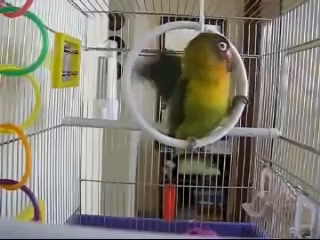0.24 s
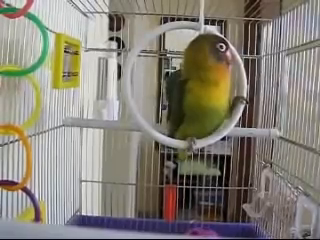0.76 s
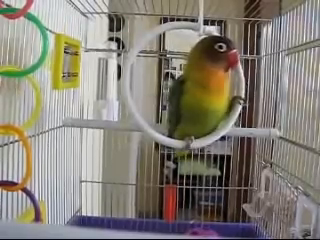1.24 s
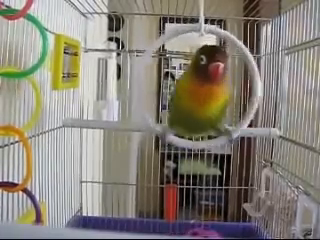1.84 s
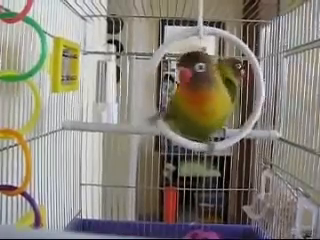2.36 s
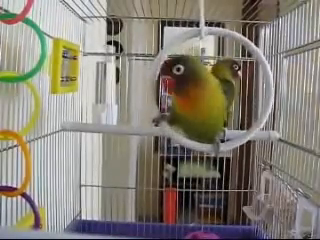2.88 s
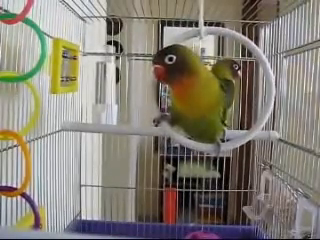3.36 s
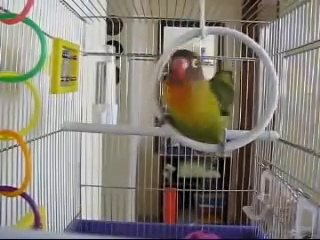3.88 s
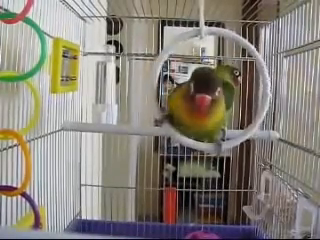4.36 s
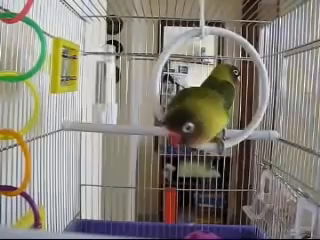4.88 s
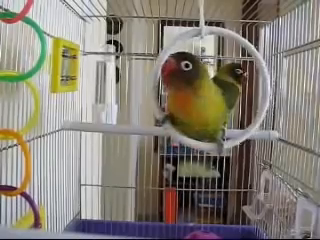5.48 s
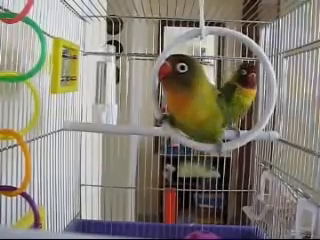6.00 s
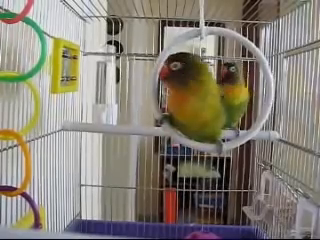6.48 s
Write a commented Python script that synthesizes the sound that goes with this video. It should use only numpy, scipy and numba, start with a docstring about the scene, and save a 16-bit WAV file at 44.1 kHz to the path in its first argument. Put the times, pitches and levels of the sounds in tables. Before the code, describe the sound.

In a lived-in room, lovebirds chirp shrilly near a stereo camera microphone. A quick cluster of chirps, a long pause, a faint squeal and a tiny chirp lead to a strong scratchy warble, then a softer one, then rapid loud chattering that clips slightly. Metallic cage reflections and short echoes surround each call; low hum and soft noise sit slightly left.

```python
"""A living room: lovebirds chirp shrilly in a wire cage, close to a small camera's stereo microphone.
Each syllable (chirp, pip, warble or chatter note) is a darting whistle with rasp, coloured by throat and beak.
The cage scatters it at once, nearby walls return echoes and the room rings.
Behind the birds, a little to the left, lie noise shaped as room tone, sine hums and a faint far tone in arches."""
import sys
import numpy as np
from scipy import signal
from scipy.fft import rfft, irfft, next_fast_len
from scipy.io import wavfile
from numba import njit

SR = 44100
rng = np.random.default_rng(int(sys.argv[2]) if len(sys.argv) > 2 else 0)


def wav_out(sig):
    """Save sig, one row per channel (or a flat mono array), as 16-bit PCM at SR to the path in sys.argv[1]."""
    wavfile.write(sys.argv[1], SR, np.round(np.clip(np.atleast_2d(sig).T, -1, 1) * 32767).astype(np.int16))


N = 297234
T = np.arange(N) / SR  # seconds

# Resonances of throat and open beak. Each row: frequency in Hz, relative gain in dB.
THROAT_RESONANCE = [(1000, -40.5), (1850, -27), (2400, -8.5), (3400, 0), (4900, 7.5), (6400, -3.5),
                    (8000, 3), (10000, 1), (12000, -4.5)]
# Chirps, a low lead-in that flicks up and falls back. Each row: top of the flick in seconds, lead-in in s,
# fall in s, glide in s, lead-in pitch in Hz, landing pitch in Hz, end pitch in Hz, lead-in level in dB,
# level in dB, rasp 0-1, overtones in dB before a common lift, spill into the room in dB.
CHIRP_NOTES = [(0.001, .012, 0.012, 0.012, 2700, 6050, 4620, -80, -8.5, 0.23, -27, 7.5),
               (0.072, 0.014, 0.0079, 0.016, 2770, 3950, 4664, -17, -9, 0.12, -8, 9.5),
               (0.170, 0.013, 0.0092, 0.02, 2696, 4300, 5185, -15, -6, 0.23, -12.5, 9),
               (0.304, 0.028, 0.0087, 0.011, 3790, 5357, 5486, -9, -7.5, 0.29, -13.5, 4.5),
               (1.760, 0.012, .018, .015, 2389, 5323, 2303, -19.5, -19, .4, -15, 9),
               (2.853, 0.015, 0.022, 0.012, 2347, 4634, 4350, -11, -8, 0.63, -11, 0),
               (6.605, .017, 0.0051, 0.03, 2465, 4524, 5277, -19, -13, 0.5, -9, 4)]
# A quick run of chatter notes. Each row: start in seconds, length in s, end pitch in Hz, level in dB,
# overtones in dB before a common lift, spill into the room in dB.
CHATTER_NOTES = [(5.597, .020, 4933, 2.5, -10.5, 0), (5.667, .022, 4528, 2.5, -10.5, 0.5),
                 (5.744, 0.023, 3583, 3, -9.5, 0.5), (5.82, 0.029, 4094, 2.5, -6, 2),
                 (5.899, .022, 4560, 2.5, -9.5, -3), (5.974, .018, 4825, 2.5, -13, -2.5),
                 (6.0623, 0.019, 5370, 0.5, -16, -2.5)]
# Pips, one small arch of pitch each. Each row: start in seconds, length in s, top pitch in Hz, bend in Hz,
# starting level in dB, rasp 0-1, overtones in dB before a common lift, spill into the room in dB.
PIP_NOTES = [(1.736, 0.012, 5760, 600, -26.5, 0.62, -18, 8),
             (2.811, 0.0076, 2552, 200, -14, 0.41, -14.5, 1.5),
             (2.833, 0.0028, 5190, 1300, -6.5, 0.6, -5.5, -1.5),
             (2.881, 0.019, 7300, 150, -9.5, 0.19, -30.5, 0), (3.781, 0.02, 2420, 100, -38, .8, -22, 10),
             (5.145, .004, 3850, 300, -17, .3, -14, 4.5), (5.384, 0.0061, 2578, 120, -10, 0.9, -11, -2),
             (5.393, 0.0035, 6200, 400, -11, 0.4, -13.5, 0),
             (5.449, 0.0056, 5100, 300, -14, 0.37, -7, -13.5),
             (5.46, 0.0051, 4930, 1000, -12, 0.73, -6.5, -6.5),
             (5.468, 0.003, 5350, 500, -10, 0.39, -6.5, -0.5),
             (5.531, 0.0081, 6660, 1200, -13, 0.3, -19.5, -1),
             (5.661, 0.006, 4400, 400, -5.5, 1, -9, -19.5),
             (5.8127, 0.0027, 5206, 500, 6, 0.57, -20.5, -30),
             (5.885, 0.0027, 4450, 400, -13.5, 1, -8.5, -15),
             (6.5798, 0.0046, 5520, 2300, -13, 0.52, -11, 10),
             (6.627, 0.016, 6280, 200, -16.5, 0.63, -23, 8.5)]
# Warbles, the long wandering whistles, one list each.
# Each row: time in seconds, pitch in Hz, level in dB before the effort is added.
WARBLE_CONTOURS = [
    [(1.794, 4920, -26), (1.806, 5596, -20), (1.844, 5355, -30.5), (1.862, 4325, -13), (1.872, 4329, -11.5),
     (1.892, 3357, -13), (1.898, 6850, -18.5), (1.906, 6130, -22), (1.928, 6080, -19)],
    [(3.796, 2515, -18.5), (3.812, 2956, -19), (3.818, 4023, -15), (3.832, 3546, -12), (3.84, 5313, -14.5),
     (3.892, 3775, -14), (3.902, 3190, -16.5), (3.91, 4710, -18), (3.94, 5200, -18.5), (3.96, 5020, -17),
     (3.968, 2920, -20.5), (3.984, 2480, -22.5)],
    [(3.992, 2673, -28), (4.006, 2821, -23.5), (4.012, 3500, -20.5), (4.016, 3460, -12.5),
     (4.028, 2503, -8.5), (4.032, 4660, -6)],
    [(4.033, 6860, -18), (4.041, 7306, -19.5), (4.049, 6790, -20.5), (4.053, 6140, -16),
     (4.061, 5090, -14.5), (4.069, 4361, -17.5), (4.083, 4190, -18), (4.107, 3207, -23.5),
     (4.112, 3620, -27)],
    [(4.115, 5740, -22), (4.121, 4700, -24.5), (4.131, 4890, -14), (4.139, 4390, -22.5), (4.149, 4790, -14),
     (4.156, 4220, -20)],
    [(4.161, 4930, -16.5), (4.173, 2492, -16), (4.175, 2397, -17), (4.179, 4210, -22), (4.183, 5070, -11.5)],
    [(5.1, 4799, -18.5), (5.104, 7109, -25.5), (5.108, 5335, -37.5), (5.114, 2846, -20), (5.118, 2423, -16),
     (5.126, 2441, -13), (5.144, 2440, -19.5)],
    [(5.15, 5285, -19), (5.166, 6694, -33), (5.176, 5720, -17.5), (5.184, 3890, -19.5),
     (5.198, 4281, -13.5), (5.214, 3683, -14), (5.222, 5014, -14.5), (5.246, 4650, -22.5),
     (5.268, 4880, -15), (5.284, 2187, -24.5), (5.296, 2200, -23.5)],
]
# How each warble is voiced. Each row: effort in dB, rasp 0-1, overtones in dB before a common lift,
# spill into the room in dB.
WARBLE_VOICING = [(-2.5, .45, -7.5, 9), (-1.5, .35, -12, 5.5), (7, 0.3, -6.5, 4.5), (12.5, .22, -8.5, -2.5),
                  (12, 0.3, -18, -5.5), (7.5, .9, -15, 0), (1.5, .12, -8.5, 6), (-3.5, 0.3, -13.5, 9)]
# Colour of the room's ring. Each row: frequency in Hz, relative gain in dB.
RING_COLOUR = [(500, 0), (2400, 9), (3500, 6), (4800, 3), (6500, 2), (8500, -10.5), (12000, -9)]
# Spectrum of the room noise. Each row: frequency in Hz, relative density in dB per Hz.
ROOM_NOISE_COLOUR = [(15, -34.5), (25, -2), (96, -10), (124, -4), (237, -4), (386, -14.5), (418, -13),
                     (615, -13), (682, -17), (1730, -22.5), (4380, -33.5), (7740, -41), (12000, -71),
                     (15600, -102), (22000, -120)]
# Swelling mains hum. Each row: time in seconds, rms level in dB before the stereo balance.
HUM_LEVEL = [(0, -68.5), (2.0, -67.5), (3.9, -70), (4.3, -47.5), (4.65, -51.5), (4.95, -49.5), (5.3, -50.5),
             (6.3, -48), (6.74, -59.5)]
# Narrow lines of an appliance. Each row: frequency in Hz, rms level in dB before the stereo balance.
APPLIANCE_LINES = [(48, -64.5), (94, -68.5), (228, -70), (294, -69.5), (392, -74.5), (7870, -99)]
# Slow arches of a faint far tone. Each row: top of the arch in seconds, top pitch in Hz,
# rms level there in dB before its waver and the stereo balance.
FAR_TONE_ARCHES = [(0.882, 618, -70.5), (3.12, 597.3, -66), (5.349, 597.6, -70.5)]


def birds(edge_s=0.00084):
    """Sum the syllables of the syrinx: the beam reaches the microphone, the spill sets off the room."""
    shake, flutter, doubling = wobble(hz=627), wobble(hz=412.6), wobble(hz=70)
    turbulence = unit(colour(rng.standard_normal(N), THROAT_RESONANCE))
    trill = np.sin(2 * np.pi * 208.44 * T + 1.5 * wobble(hz=53.9))
    beam, spill = np.zeros((2, N))
    for whistle, rasp, bright_db, spill_db in syllables():
        start, end = whistle[0][0], whistle[-1][0]
        i = np.flatnonzero((T > start - edge_s) & (T < end + edge_s))
        hz, db = curves(whistle, T[i])
        voice = syrinx(hz, rasp, bright_db, shake[i], trill[i], flutter[i], doubling[i], turbulence[i])
        gate = np.clip(np.minimum(T[i] - start, end - T[i]) / edge_s / 2 + .5, 0, 1)
        voice = voice * np.sin(gate * np.pi / 2) ** 2 * undb(db)
        # a beak near the microphone and aimed at it leaves less for the room
        beam[i] += voice
        spill[i] += voice * undb(spill_db)
    return beam, spill


def syrinx(hz, rasp, bright_db, shake, trill, flutter, doubling, turbulence):
    """Rasp shakes pitch and strength, doubles the period and adds turbulent hiss."""
    jitter, trill_depth = .09, .1  # fractions of the pitch at full rasp
    shimmer_db, hiss_db = 2.5, -2.5  # at full rasp
    overtone_db, third_db, half_db = 2.0, -3.0, -26.0  # overtone lift, step per harmonic, half lines
    k = np.arange(1, 11)[:, None] / 2  # harmonics and the half lines between them
    hz = hz * (1 + rasp * (jitter * shake + trill_depth * trill))
    phase = 2 * np.pi * np.cumsum(hz) / SR
    source = undb(np.where(k > 1, bright_db + overtone_db + third_db * (k - 2), 0))
    # half lines come and go in rough syllables
    half_lines = rasp * undb(half_db + 1.8 * doubling)
    source = source * np.where(k % 1, half_lines, 1)
    # low notes put their second harmonic on the throat resonance and sound harsher
    weights = source * response(THROAT_RESONANCE, k * hz) * (k * hz < SR / 2)
    tone = (weights * np.sin(k * phase)).sum(0) / np.sqrt((weights ** 2).sum(0) / 2)
    hiss = rasp * undb(hiss_db) * turbulence
    return unit((tone + hiss) * undb(shimmer_db * rasp * flutter))


def syllables():
    """Every syllable as (whistle of (s, Hz, dB) points, rasp, overtones dB, spill dB)."""
    chirps = [chirp(*row) for row in CHIRP_NOTES]
    chatters = [chatter(*row) for row in CHATTER_NOTES]
    pips = [pip(*row) for row in PIP_NOTES]
    warbles = [warble(whistle, *row) for whistle, row in zip(WARBLE_CONTOURS, WARBLE_VOICING)]
    return chirps + chatters + pips + warbles


def chirp(at, lead_s, fall_s, glide_s, low_hz, landing_hz, end_hz, lead_db, db, *voicing):
    """A chirp swells while its low pitch sinks, flicks to the top, falls back and glides to its end."""
    flick_s, top_hz, lead_sag_hz = .0055, 6296, 800
    landed = at + fall_s
    whistle = [(at - max(lead_s, flick_s), low_hz + lead_sag_hz, lead_db - 7),
               (at - flick_s, low_hz, lead_db),
               (at, top_hz, db - 2),
               (landed, landing_hz, db),
               (landed + glide_s / 2, (landing_hz + end_hz) / 2, db),
               (landed + glide_s, end_hz, db - 5)]
    return whistle, *voicing


def chatter(at, length_s, end_hz, db, *voicing):
    """A chatter note starts at full force, leaps to the top and ripples down."""
    start_hz, top_hz, rise_s = 3975, 6565, 0.0034
    ripple_hz, ripple_depth, ripple_build_s = 149.35, .14, .005  # depth as a fraction of the pitch
    rasp, release_s, fade_db = .35, 0.0052, -4.5
    t = T[T < length_s]
    hz = np.interp(t, [0, rise_s, length_s], [start_hz, top_hz, end_hz])
    falling = np.maximum(t - rise_s, 0)
    build = np.minimum(falling / ripple_build_s, 1)
    ripple = ripple_depth * build * np.sin(2 * np.pi * ripple_hz * falling)
    release_db = np.interp(t, [length_s - release_s, length_s], [0, fade_db])
    return np.column_stack([at + t, hz * (1 + ripple), db + release_db]), rasp, *voicing


def pip(at, length_s, top_hz, bend_hz, db, *voicing):
    """A pip bends up and down once; its second half fades."""
    whistle = [(at, top_hz - bend_hz, db),
               (at + length_s / 2, top_hz, db),
               (at + length_s, top_hz - bend_hz, db - 5)]
    return whistle, *voicing


def warble(whistle, effort_db, *voicing):
    """A warble follows its own contour, pushed by the bird's effort."""
    return [(s, hz, db + effort_db) for s, hz, db in whistle], *voicing


def cage_and_room(beam, spill):
    """Bars and tray scatter the chirp at once, nearby walls return single echoes, the ring builds up behind."""
    cage_db, cage_s = 3.0, 0.0011
    walls_db, walls_s, echoes_per_s = -8, .035, 400
    room_db, build_s, room_t60 = -16.5, 0.0026, .44  # t60: seconds to decay by 60 dB
    t = T[:SR * 3 // 4]
    near, early, far = rng.standard_normal((3, 2, len(t)))
    cage = undb(cage_db) * unit(near * np.exp(-t / cage_s) * (t > .0003))
    sparse = early * (rng.random(early.shape) < echoes_per_s / SR)
    walls = undb(walls_db) * unit(sparse * np.exp(-t / walls_s) * (t > .006))
    ring = colour(far, RING_COLOUR) * undb(-60 * t / room_t60) * (1 - np.exp(-t / build_s))
    room = undb(room_db) * unit(ring)
    from_cage = signal.fftconvolve(beam[None], cage, axes=1)
    from_room = signal.fftconvolve(spill[None], walls + room, axes=1)
    return beam + (from_cage + from_room)[:, :N] / np.sqrt(len(t))  # responses to unit energy


def background():
    """Room noise, hums and the far tone, all balanced a little to the left."""
    left_db = 1.7
    tones = mains_hum() + appliance() + far_tone()
    return (room_noise() + np.sqrt(2) * tones) * undb([[left_db], [-left_db]])  # sine peak to rms


def room_noise():
    """Shaped noise, wide in stereo through its side signal, that swells irregularly."""
    level_db, side_db, swell_db = -61.5, -3, .7
    mid, side = (unit(colour(rng.standard_normal(N), ROOM_NOISE_COLOUR)) for _ in range(2))
    stereo = mid + undb(side_db) * side * np.array([[1], [-1]])
    return stereo * undb(level_db + swell_db * wobble(hz=3.4))


def mains_hum():
    """A pure low sine whose level rises and falls."""
    return undb(curves(HUM_LEVEL, T)[0]) * np.sin(2 * np.pi * 99.0 * T)


def appliance():
    """Sines of constant level whose phases drift slowly."""
    return sum(undb(db) * np.sin(2 * np.pi * hz * T + 1.3 * wobble(hz=2.3)) for hz, db in APPLIANCE_LINES)


def far_tone():
    """A wavering tone that swells as it rises and fades as it sinks."""
    sag_hz, fade_db = 430, 50  # drop per squared second from the top
    waver_db = 3
    out = 0
    for at, top_hz, db in FAR_TONE_ARCHES:
        away = np.minimum((T - at) ** 2, 1)
        phase = 2 * np.pi * np.cumsum(top_hz - sag_hz * away) / SR
        level = undb(db - fade_db * away + waver_db * wobble(hz=24))
        out = out + level * np.sin(phase + 1.4 * wobble(hz=14))
    return out


def undb(db):
    """Decibels to gain."""
    return 10 ** (np.asarray(db) / 20)


def unit(x):
    """Scale to rms 1."""
    return x / np.sqrt(np.mean(x ** 2))


def curves(table, t):
    """The columns of a table, joined by straight lines in time."""
    s, *columns = np.transpose(table)
    return [np.interp(t, s, c) for c in columns]


def response(points, hz):
    """Gain of a (Hz, dB) spectrum at the given frequencies."""
    f, db = np.transpose(points)
    return undb(np.interp(np.log(hz + 1), np.log(f), db))


def colour(x, points):
    """Filter by a (Hz, dB) spectrum."""
    n = x.shape[-1]
    size = next_fast_len(n)
    hz = np.arange(size // 2 + 1) * SR / size
    return irfft(rfft(x, size) * response(points, hz), size)[..., :n]


def wobble(hz):
    """Random motion up to about a given rate, rms 1."""
    lowpass = signal.butter(2, hz, fs=SR, output="sos")
    return unit(signal.sosfilt(lowpass, rng.standard_normal(N)))


def scene():
    """The birds in their cage over the quiet room."""
    return cage_and_room(*birds()) + background()


def overload(x):
    """The loudest peaks flatten, one side earlier than the other."""
    ceiling, lopsided = 2.8, .28
    return np.clip(x, -ceiling * (1 + lopsided), ceiling)


@njit
def follow(x, attack, release, e):
    """Envelope that starts at e, rises fast and sinks slowly."""
    out = np.empty(len(x))
    for i in range(len(x)):
        e += (x[i] - e) * (attack if x[i] > e else release)
        out[i] = e
    return out


def gain_control(x, knee_db=-6.0, slope=0.97, attack_s=0.000063, release_s=0.25, start_db=0.):
    """The gain, already low at first, ducks under loud chirps and creeps back."""
    peaks = abs(x).max(0)
    envelope = follow(peaks, 1 / (1 + attack_s * SR), 1 / (release_s * SR), float(undb(start_db)))
    return x * np.maximum(envelope / undb(knee_db), 1) ** -slope


def record(dry):
    """The camera overloads on peaks, rides its gain and cuts the top."""
    lowpass = signal.ellip(10, .3, 70, 12400, fs=SR, output="sos")  # ripple dB, stopband dB, edge Hz
    return signal.sosfilt(lowpass, gain_control(overload(dry)))


dry = scene()
out = record(dry)
wav_out(out)
```